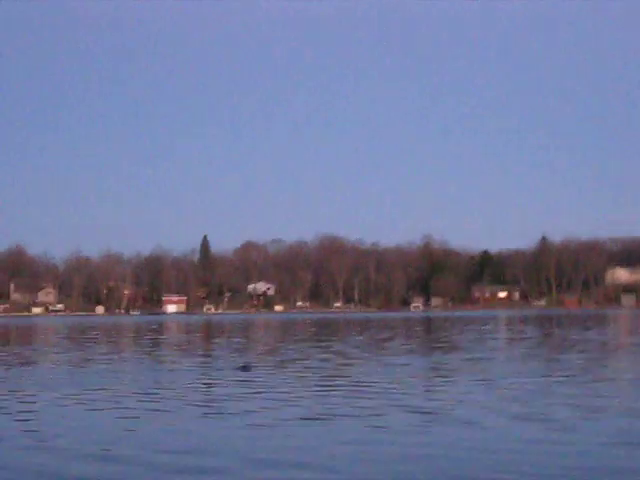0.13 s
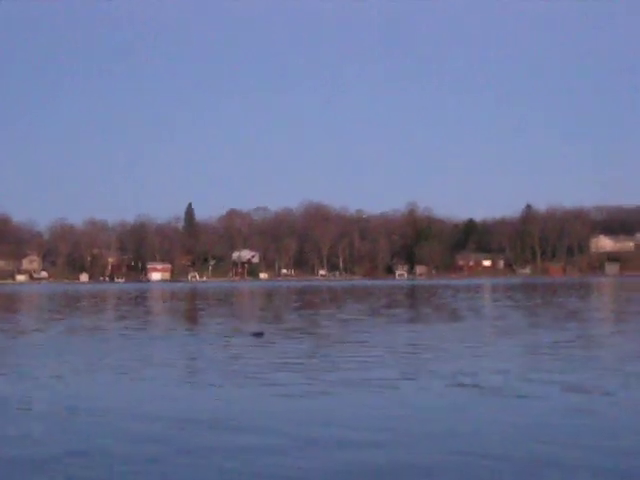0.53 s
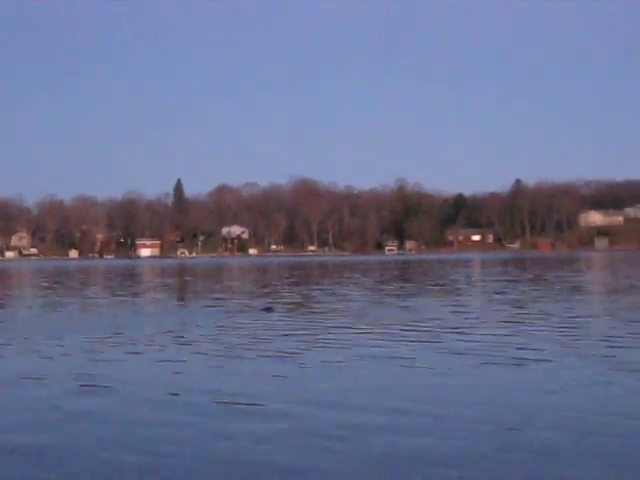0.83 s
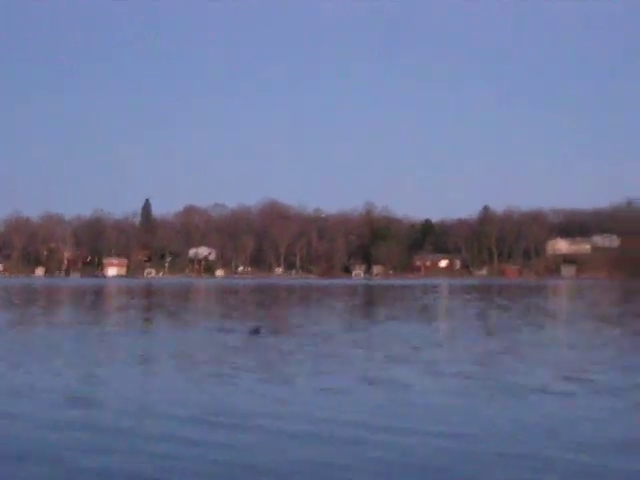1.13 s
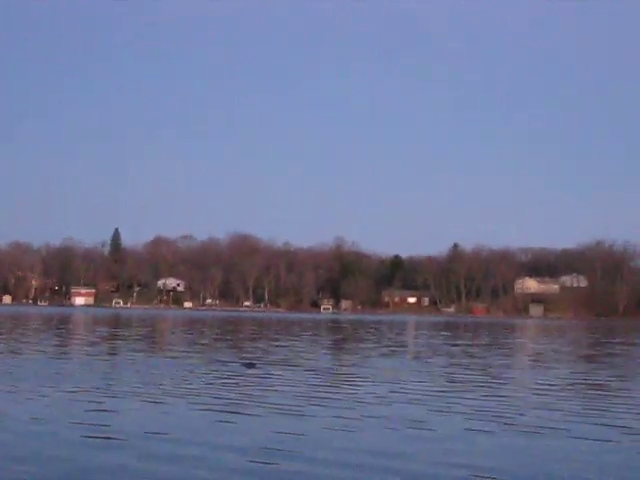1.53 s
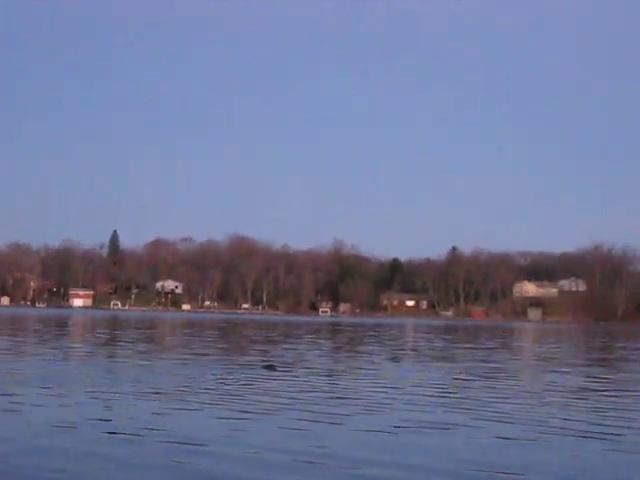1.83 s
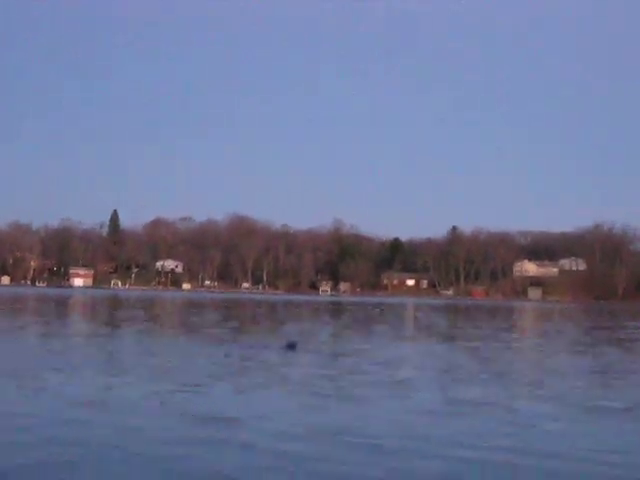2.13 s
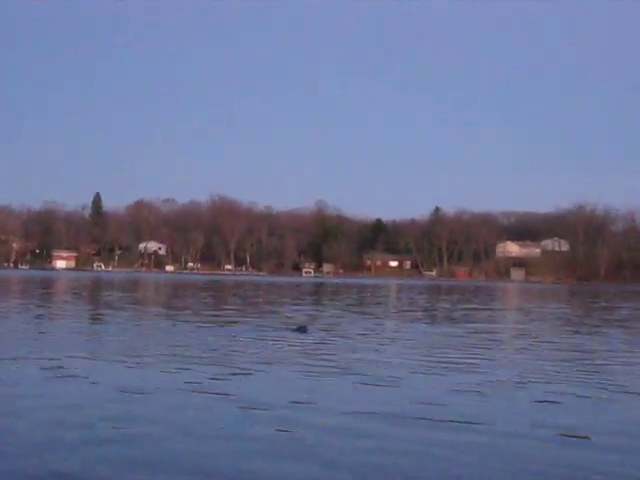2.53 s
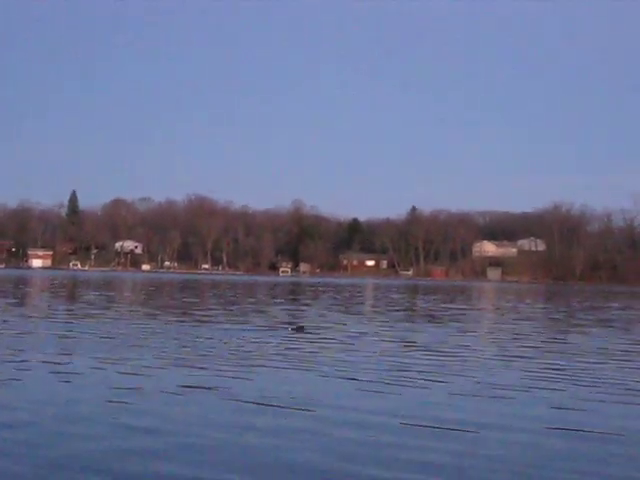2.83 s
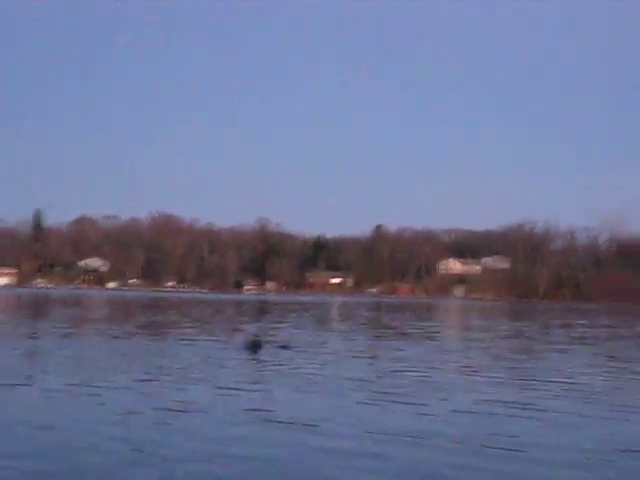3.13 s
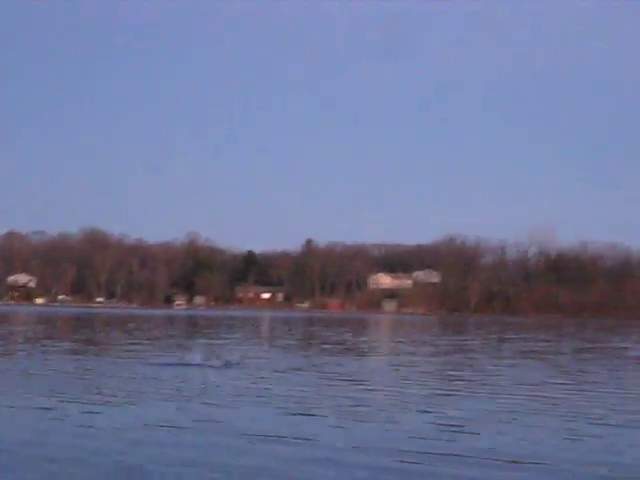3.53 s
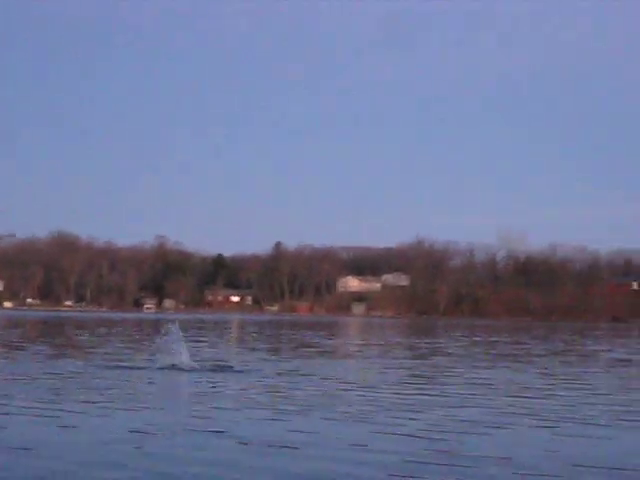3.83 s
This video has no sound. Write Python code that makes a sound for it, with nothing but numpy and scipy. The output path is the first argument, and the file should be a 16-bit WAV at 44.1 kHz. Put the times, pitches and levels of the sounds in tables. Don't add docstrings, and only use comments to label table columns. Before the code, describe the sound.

Close lapping water with bubbly plips and bright droplet ticks starts after quiet air and finger clicks, grows busier, then one loud slap cracks across the lake, followed by a softer plop and falling spray.

```python
import sys
import numpy as np
from scipy import signal
from scipy.io import wavfile
from scipy.ndimage import uniform_filter1d

SR = 44100
rng = np.random.default_rng(int(sys.argv[2]) if len(sys.argv) > 2 else 0)


def store_wav(level_fs):
    pcm = np.round(np.clip(np.atleast_2d(level_fs), -1, 1) * 32767)
    wavfile.write(sys.argv[1], SR, pcm.T.astype(np.int16))


def voltage_ratio(decibels):
    exponent = np.asarray(decibels, float) / 20
    return 10 ** exponent


N = 176400
TIME = np.arange(N) / SR

# t/s, level/dB
STIR = [(1.4, -64), (1.44, -49.5), (1.62, -48.5), (1.68, -58), (1.8, -49.5), (2.2, -53.5), (2.35, -47),
        (2.52, -48), (2.85, -38), (3.24, -38.5), (3.31, -37), (3.47, -43), (3.63, -38.5), (3.8, -43),
        (4.0, -42)]


def stirring():
    s, db = np.transpose(STIR)
    return np.interp(TIME, s, db, left=-120)


# t/s, peak level/dB, f/Hz
GULPS = [(1.477, -29, 1025), (1.529, -36, 614), (1.711, -43.5, 1000), (1.831, -36.5, 877),
         (1.853, -30.5, 559), (2.0, -34.5, 1157), (2.114, -31.5, 1380), (2.268, -36.5, 1075),
         (2.318, -32.5, 848), (2.34, -35.5, 870), (2.571, -26.5, 796), (2.599, -32, 1120),
         (2.702, -29, 1046), (2.823, -25.5, 1124), (2.971, -23, 1000), (3.059, -23, 1340),
         (3.064, -32.5, 531.5), (3.253, -30, 1180), (3.755, -26, 1137), (3.952, -31, 1073),
         (1.512, -38.5, 1410), (1.565, -34, 796), (1.617, -34, 1085), (1.724, -51, 1266), (1.782, -41, 730),
         (1.85, -35.5, 1107), (1.945, -40.5, 1000), (2.545, -41, 600), (2.902, -31, 1150),
         (3.79, -34, 1100), (3.866, -31.5, 908), (3.533, -38.5, 550), (2.125, -41, 687), (2.925, -37, 637),
         (1.8, -42.5, 1155)]


def gulps():
    s, db, hz = np.transpose(GULPS)
    octaves_per_s = np.full_like(hz, 4.8)
    return bubbles(s, db, hz, 70 / hz, octaves_per_s, size=3500)


# t/s, peak level/dB, f/Hz
PLIPS = [(1.433, -34, 2460), (1.459, -33.5, 1630), (1.511, -34.5, 1800), (1.533, -36, 1800),
         (1.582, -33, 2550), (1.6844, -41, 2100), (1.7628, -32, 1910), (1.787, -33.5, 1800),
         (1.771, -32.5, 2610), (1.451, -36.5, 3650), (1.548, -37, 2400), (1.875, -38, 4660),
         (1.838, -39, 2640), (1.924, -33, 2500), (2.0763, -36, 2780), (2.317, -40, 1900),
         (2.3585, -33, 3120), (2.4447, -29.5, 3512), (2.634, -28.5, 3520), (2.6992, -27, 2450),
         (2.7644, -32, 2100), (2.794, -22, 2840), (2.844, -23.5, 1540), (2.8575, -21, 2690),
         (3.061, -13.5, 3410), (3.1253, -30, 2030), (3.148, -21.5, 3230), (3.1562, -24, 3330),
         (3.279, -26.5, 3320),
         (0.821, -42.5, 2330),
    (3.3784, -28.5, 1690),
    (3.391, -26, 2050),
    (3.454, -32.5, 4400),
    (3.916, -31, 1700),
]


def plips():
    s, db, hz = np.transpose(PLIPS)
    octaves_per_s = np.full_like(hz, 5.3)
    return bubbles(s, db, hz, 64.6 / hz, octaves_per_s, size=1500)


# t/s, peak level/dB, start f/Hz, end f/Hz, length/s
SWEEPS = [(1.621, -32, 1150, 3800, 0.027), (1.552, -41.5, 480, 1105, 0.058), (3.873, -35, 520, 955, 0.0456),
          (3.87, -45.5, 290, 234, 0.049), (2.2, -48, 540, 530, .075), (2.33, -52, 440, 570, 0.08),
          (2.5, -50, 430, 460, 0.092), (2.85, -50.5, 290, 550, 0.16), (2.72, -50, 320, 490, 0.114),
          (3.185, -53.5, 340, 1500, 0.115), (2.09, -52, 520, 630, 0.13), (2.0, -52.5, 710, 550, 0.073),
          (2.572, -40, 520, 650, .045), (3.468, -51, 290, 305, 0.047), (3.15, -31.5, 1000, 1490, 0.0345),
          (3, -35, 1000, 1040, 0.024)]


def sweeps():
    s, db, start, end, length = np.array(SWEEPS).T[:, :, None]
    u = np.minimum(np.arange(6800) / SR / length, 1)
    body = voltage_ratio(db) * np.sin(np.pi * u ** 0.62) ** 0.75
    return sing(s[:, 0], body, start * (end / start) ** u ** 1.84)


# rate/(1/s), level re stir/dB, lowest f/Hz, highest f/Hz, decay/cycles
GRAINS = [
    (59.2, -11.5, 300, 517, 35),
    (302, -6.5, 480, 1300, 40.5),
    (1000, 4, 979, 4215, 19.8),
    (550, -1, 3860, 7230, 18),
]
GRAIN_SPREAD_DB, GRAIN_RISE, CLUMP_DB = 5, 0.3, 5


def gurgle(stir_db):
    out = 0
    for per_s, db, low_hz, high_hz, cycles in GRAINS:
        chance = per_s * voltage_ratio(CLUMP_DB * drift(12)) / SR
        born = np.flatnonzero((rng.random(N) < chance) & (TIME > STIR[0][0]))
        pitch_u, decay_u, level_u, rise_u = rng.random((4, len(born)))
        hz = low_hz * (high_hz / low_hz) ** pitch_u
        t60 = cycles * (0.55 + 1.38 * decay_u) / hz
        level = stir_db[born] + db - GRAIN_SPREAD_DB * np.log(level_u + 1 / 12) - 4.5
        rise = GRAIN_RISE * 4 * rise_u ** 2 / t60
        out = out + bubbles(born / SR, level, hz, t60, rise, size=int(cycles / low_hz * SR * 2 / 3))
    return out


# t/s, peak level/dB, centre f/Hz
TICKS = [(1.4638, -26.5, 12500), (1.541, -33, 13800), (1.6554, -21, 12000), (2.004, -36, 13700),
         (2.036, -29.5, 12500), (2.0742, -30, 14000), (2.1066, -33, 10500), (2.17, -39, 15550),
         (2.202, -35, 9500), (2.2573, -37, 10300), (2.2847, -25.5, 9900), (2.3178, -31, 8900),
         (2.3402, -25.5, 12300), (2.3946, -23.5, 13300), (2.4452, -22.5, 9910), (2.5117, -30, 15000),
         (2.5762, -35, 13800), (2.611, -31, 14000), (2.6337, -29, 14300), (2.6514, -23, 12400),
         (2.6983, -27, 13100), (2.8437, -28, 11900), (2.8723, -22, 13600), (2.9123, -39, 15100),
         (2.9248, -32, 14200), (2.9554, -21, 12500), (2.9836, -28, 12100), (3.059, -24, 15500),
         (3.1551, -24.5, 9910), (3.1594, -22.5, 13600), (3.213, -29, 9950),
         (3.3821, -22, 12300),
    (3.4301, -25, 13300),
    (3.477, -27, 12100),
    (3.6127, -31, 10800),
    (3.656, -24, 9200),
]


def ticks():
    t60_s = 0.0038
    return snaps([(*row, t60_s) for row in TICKS], sharpness=1.8)


# t/s, peak level/dB, centre f/Hz
PATS = [(1.711, -35, 5050), (1.733, -35.5, 6900), (1.7746, -32.5, 4530), (2.1066, -31, 3670),
        (2.2328, -34, 4600), (2.2573, -40, 4994), (2.318, -30.5, 3630), (2.377, -34, 4680),
        (2.3885, -31.5, 5770), (2.6517, -20.5, 5780), (2.6793, -36, 3640), (2.8143, -31, 5970),
        (3.0024, -27, 5330), (3.0954, -28.5, 5610), (3.1114, -44, 5560), (3.2016, -48, 3790),
        (3.218, -21.5, 6500), (3.229, -23.5, 3720), (3.4296, -28, 6400), (3.7385, -28, 3770)]


def pats():
    t60_s = 0.016
    return voltage_ratio(0.5) * snaps([(*row, t60_s) for row in PATS], sharpness=6.9)


CRACKLE_PER_S, CRACKLE_DB, CRACKLE_T60_S = 90, -50.5, 0.0026
CRACKLE_FOLLOWS, CRACKLE_CLUMP_DB = 0.86, 4
CRACKLE_CALMS_S, CRACKLE_CALM_DB = 3.34, -8


def crackle(stir_db):
    out, fall = 0, voltage_ratio(-60 / (CRACKLE_T60_S * SR))
    for low_hz, high_hz in [(3500, 9100), (5000, 7400), (8500, 9800), (11000, 15600), (13000, 17000)]:
        born = rng.random(N) < CRACKLE_PER_S * voltage_ratio(CRACKLE_CLUMP_DB * drift(10)) / SR
        strength = voltage_ratio(5.6 * np.minimum(rng.exponential(1, N), 3))
        envelope = signal.lfilter([1], [1, -fall], born * strength + 1e-18)
        band = signal.butter(1, [low_hz, high_hz], "band", fs=SR, output="sos")
        out = out + signal.sosfilt(band, rng.standard_normal(N)) * envelope
    level_db = CRACKLE_DB + CRACKLE_FOLLOWS * (stir_db + 49.5) + CRACKLE_CALM_DB * (TIME > CRACKLE_CALMS_S)
    return out * voltage_ratio(level_db) * (TIME > STIR[0][0])


# f/Hz, level/dB
WASH = [(100, -45), (200, -21), (500, -7), (1500, -2), (3000, -4.5), (5300, -20), (9000, -20), (16000, -17)]


def wash(stir_db):
    return voltage_ratio(stir_db - 9.5) * banded(WASH, rng.standard_normal((2, N)), patchy_db=3.5)


# f/Hz, level/dB
SLAP_TONE = [(90, -52), (200, -13), (350, -17), (850, -5), (2000, -5.5), (6000, -9.5), (9000, -12.5),
             (16000, -23)]


def slap():
    return blow(3.3305, db=-20, hold_s=.0115, t60_s=.045, tone=SLAP_TONE)


# f/Hz, level/dB
PLOP_TONE = [(80, -25), (300, -6.5), (740, -1), (1900, -9), (2500, -13), (6800, -46), (16000, -46)]


def plop():
    return blow(3.563, db=-30, hold_s=.0095, t60_s=.05, tone=PLOP_TONE)


# t/s, peak level/dB, centre f/Hz, decay t60/s
BURSTS = [
    (3.3366, -9, 1000, .012),
    (3.3412, -12, 1600, .004),
    (3.5635, -20, 1400, .01),
    (3.564, -23, 2300, .012),
    (3.569, -21, 600, .025),
]


def bursts():
    return snaps(BURSTS, sharpness=1.9)


# f/Hz, level/dB
SPRAY_TONE = [(300, -26), (800, -3.5), (1800, 1), (3500, -4.5), (6000, -9), (9000, -18), (16000, -22)]
SPRAY_S, SPRAY_RISE_S, SPRAY_T60_S = 3.575, .05, 15
SPRAY_DB, SPRAY_BURST_DB, SPRAY_BURST_S = -40.5, 10, 0.08


def spray():
    t = np.maximum(TIME - SPRAY_S, 0)
    hiss = banded(SPRAY_TONE, rng.standard_normal((2, N)), patchy_db=2.0)
    landing_db = SPRAY_BURST_DB * np.exp(-(t / SPRAY_BURST_S) ** 4)
    onset = 1 - np.exp(-t / SPRAY_RISE_S)
    return voltage_ratio(SPRAY_DB + landing_db - 60 * t / SPRAY_T60_S) * onset * hiss


# t/s, peak level/dB, centre f/Hz, decay t60/s
CLICKS = [
    (.103, -23.5, 1200, 0.0086),
    (.1032, -27.5, 3850, 0.015),
    (.1025, -47, 11000, .008),
    (.1835, -26.5, 3630, 0.015),
    (.184, -53, 7000, .01),
    (.277, -23, 3800, 0.007),
    (.277, -34, 8900, 0.0067),
    (.735, -45, 584, 0.079),
    (.94, -42, 13000, .006),
    (.994, -42, 3970, .008),
]


def clicks():
    return snaps(CLICKS, sharpness=3.1)


def rustle():
    start_s, length_s, level_db, lowest_hz = 0.2, 0.32, -54.5, 2500
    high_pass = signal.butter(1, lowest_hz, "high", fs=SR, output="sos")
    hiss = signal.sosfilt(high_pass, rng.standard_normal(N))
    stroke = np.sin(np.pi * np.clip((TIME - start_s) / length_s, 0, 1)) ** 0.72
    return voltage_ratio(level_db) * hiss * stroke


# f/Hz, level/dB
AIR = [(20, -2.5), (120, 0), (870, -2.5), (3000, -8), (6000, -12), (9000, -16.5), (16000, -20)]


def air():
    return voltage_ratio(-55.5) * banded(AIR, rng.standard_normal((2, N)))


def bubbles(s, db, hz, t60, rise, size):
    t = np.arange(size) / SR
    db, hz, t60, rise = (np.asarray(v, float)[:, None] for v in (db, hz, t60, rise))
    decay = voltage_ratio(db - 60 * t / np.maximum(t60, 1e-3))
    onset = 1 - np.exp(-t * hz / 1.88)
    return sing(s, decay * onset * (1 - t / t[-1]), np.minimum(hz * 2 ** (rise * t), 16000))


def sing(s, body, pitch):
    wobble, wobble_db = .07, 4
    rows, size = pitch.shape
    steps = np.repeat(rng.standard_normal((2, rows, size // 100 + 1)), 100, axis=2)
    shake = uniform_filter1d(steps, 100, axis=2)[..., :size]
    phase = 2 * np.pi * np.cumsum(pitch * (1 + wobble * shake[1]), axis=1) / SR
    out = np.zeros(N)
    add(out, s, body * voltage_ratio(wobble_db * shake[0]) * np.sin(phase))
    return out


def snaps(rows, sharpness):
    out, t = np.zeros(N), np.arange(1500) / SR
    for s, db, hz, t60 in rows:
        edge = np.clip([hz * 2 ** (-1 / sharpness), hz * 2 ** (1 / sharpness)], 50, 19000)
        noise = rng.standard_normal(len(t)) * voltage_ratio(-60 * t / t60)
        burst = signal.lfilter(*signal.butter(1, edge, "band", fs=SR), noise)
        add(out, [s], voltage_ratio(db) * burst[None] / np.abs(burst).max())
    return out


def blow(s, db, hold_s, t60_s, tone):
    t, out = np.arange(-2000, 5000) / SR, np.zeros(N)
    crackling = voltage_ratio(3.1 * rng.standard_normal(len(t)))
    torn = banded(tone, rng.standard_normal((2, len(t))) * crackling)
    before = voltage_ratio(-14.5 + 2100 * np.minimum(t, 0)) * (t <= 0)
    after = (t > 0) * voltage_ratio(-60 * np.maximum(t - hold_s, 0) / t60_s - 2.2 * (t > hold_s))
    add(out, [s + t[0]], voltage_ratio(db) * torn[None] * (before + after))
    return out


def banded(spectrum, white, patchy_db=0):
    hz, db = np.transpose(spectrum)
    out, together = 0, drift(9) + .7 * drift(45)
    edges = 18 * 2 ** np.arange(0, 10.1, .5)
    for k, (low, high) in enumerate(zip(edges, edges[1:])):
        band = signal.sosfilt(signal.butter(2, [low, high], "band", fs=SR, output="sos"), white[k % 2])
        flicker = patchy_db * (0.82 * together + drift(9.1)) if patchy_db else 0
        level_db = np.interp(np.log(low * high) / 2, np.log(hz), db)
        out = out + band * voltage_ratio(level_db + flicker)
    return rms_one(out)


def drift(rate):
    r = np.exp(-80 * np.pi * rate / SR)
    slow = signal.lfilter([1], [1, -2 * r, r * r], rng.standard_normal(N // 40 + 2002))[2000:]
    return np.interp(np.arange(N) / 40, np.arange(len(slow)), rms_one(slow))


def rms_one(x):
    return x / np.sqrt(np.mean(x ** 2) + 1e-20)


def add(out, s, shapes):
    at = (np.asarray(s) * SR).astype(int)[:, None] + np.arange(shapes.shape[1])
    out += np.bincount(at.ravel(), shapes.ravel(), N)[:N]


def scene():
    stir_db = stirring()
    ringing = gulps() + plips() + sweeps() + gurgle(stir_db)
    droplets = ticks() + pats() + crackle(stir_db)
    far = slap() + plop() + bursts() + spray()
    hand = clicks() + rustle()
    return (ringing + droplets + wash(stir_db) + far + hand + air())[None]


def top_cut(x):
    return signal.sosfilt(signal.butter(12, 16820, fs=SR, output="sos"), x)


def record(dry):
    notch_hz, notch_width_hz, cutoff_hz, start_s = 7935, 1600, 16100, .0362
    notched = signal.lfilter(*signal.iirnotch(notch_hz, notch_hz / notch_width_hz, fs=SR), dry)
    cut = signal.sosfilt(signal.cheby2(16, 50, cutoff_hz, fs=SR, output="sos"), notched)
    return top_cut(cut * (TIME > start_s))


dry = scene()
out = record(dry)
store_wav(out)
```